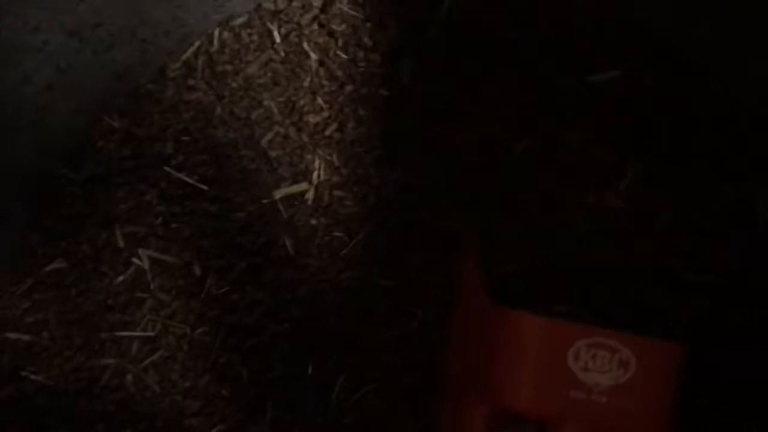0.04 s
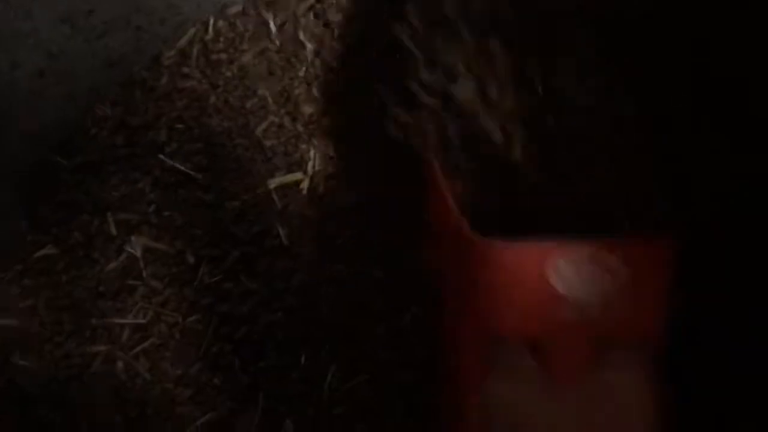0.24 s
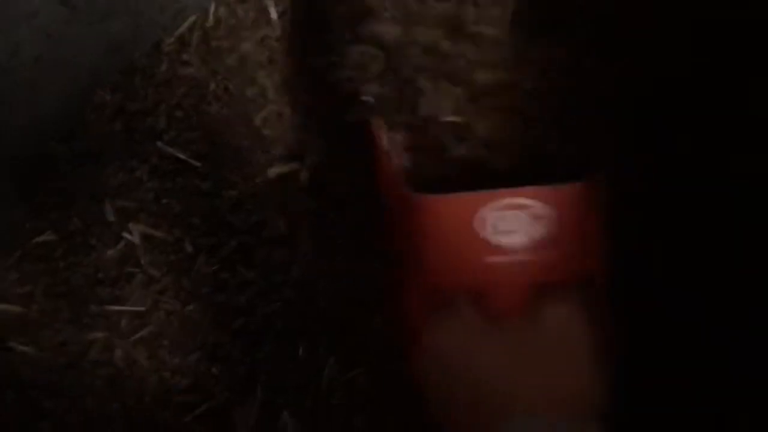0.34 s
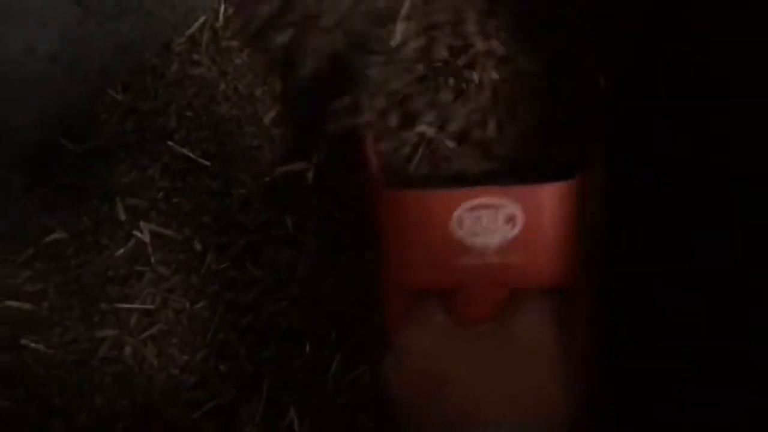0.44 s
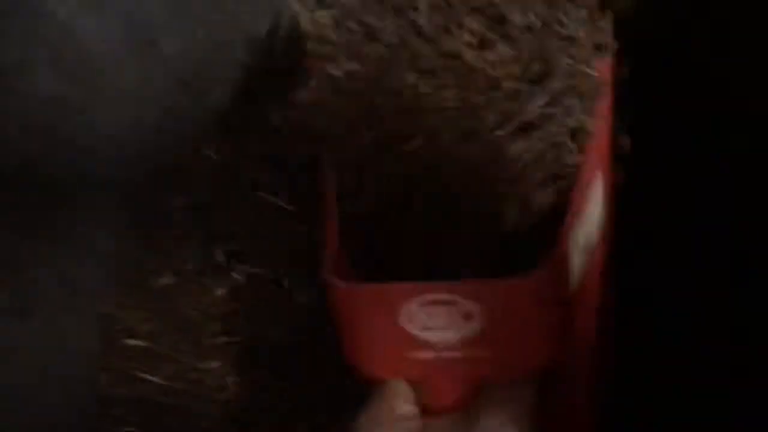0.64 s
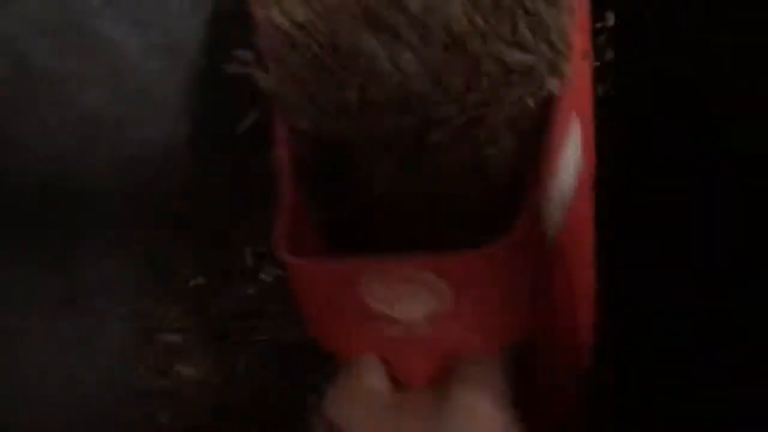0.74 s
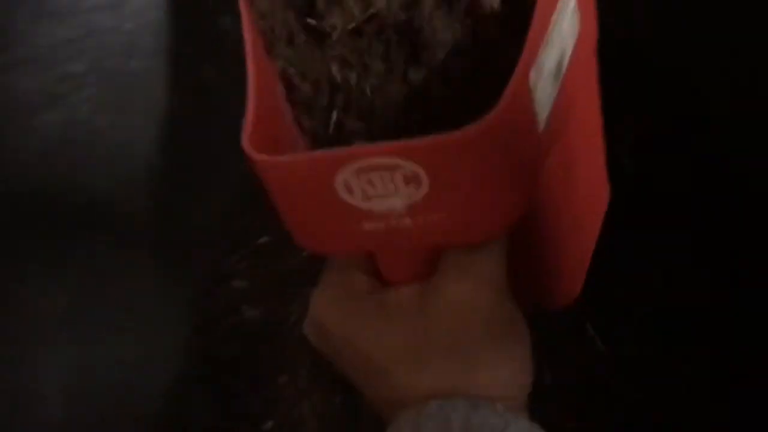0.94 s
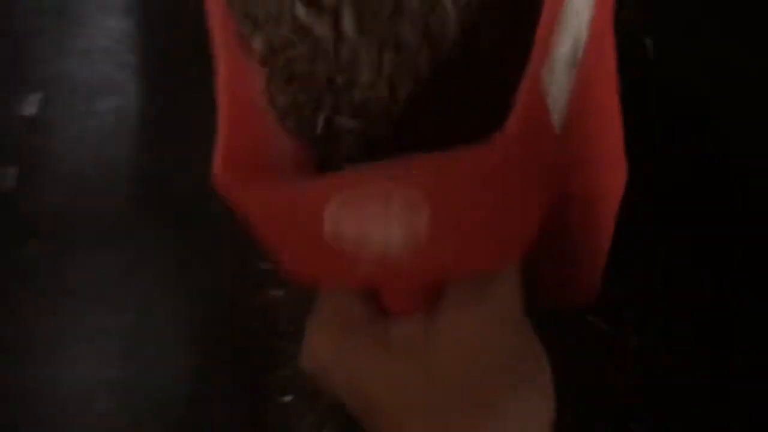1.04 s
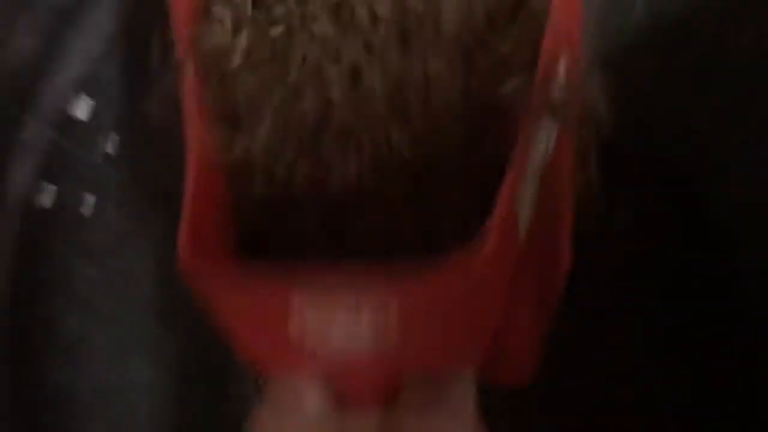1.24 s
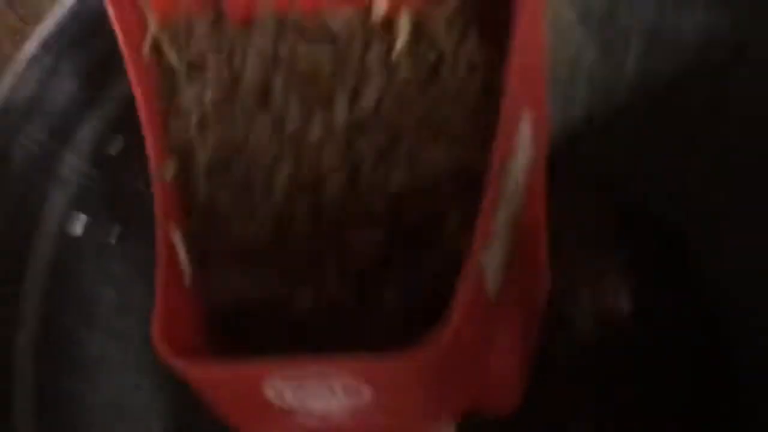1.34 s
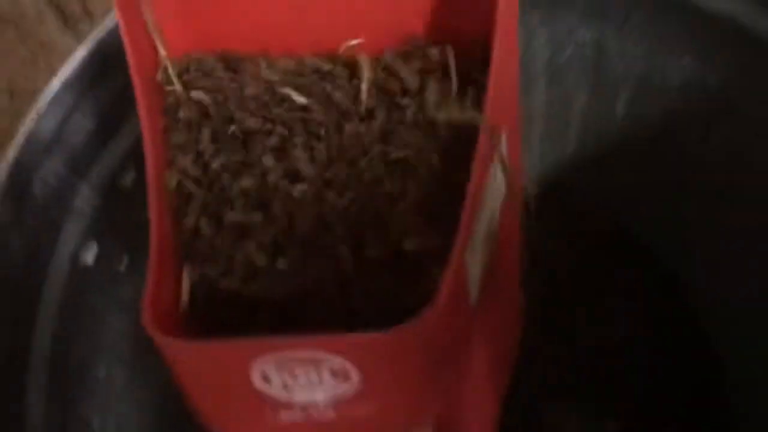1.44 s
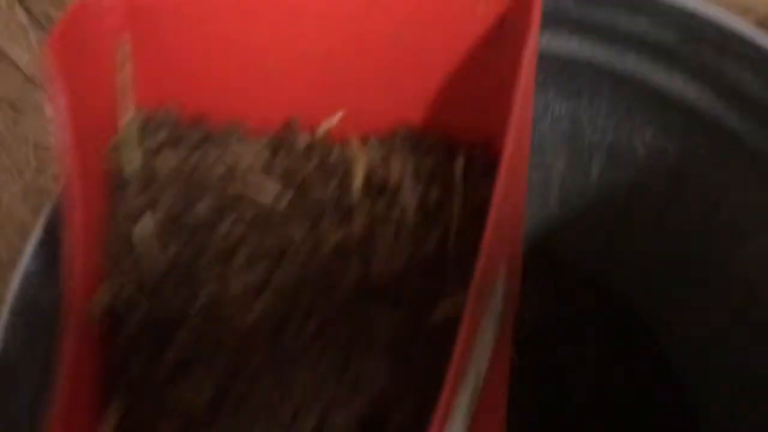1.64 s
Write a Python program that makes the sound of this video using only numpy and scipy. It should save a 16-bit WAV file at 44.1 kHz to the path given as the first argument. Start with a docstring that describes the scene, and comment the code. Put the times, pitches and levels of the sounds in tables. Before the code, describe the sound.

Close to the microphone, dry pellets rustle and crunch as a hollow plastic scoop digs in; a quieter lift follows, then a sharp rattling slide with knocks, a crisp shake and a few last strays, with short metal bin echo.

```python
"""Scoop in dry feed pellets

A plastic scoop is pushed through dry feed pellets in a thin metal bin, lifted and shaken, near a camera.
Crowds of noise puffs and tiny tones make the pellets rustle, and a moving resonance is the scoop's hollow.
Gritty noise puffs crunch, damped modes ring as pellets knock on the scoop, and both echo in the bin.
Brief low tones are the bin booming under the push, over a fading noise rumble and faint air."""
import sys
import numpy as np
from scipy import signal
from scipy.fft import rfft, irfft, next_fast_len
from scipy.io import wavfile

SR = 44100
rng = np.random.default_rng(int(sys.argv[2]) if len(sys.argv) > 2 else 0)


def transcribe(u):
    """Save the signal u as a 16-bit wav file named by the first command-line argument.

    u: samples, shape (n,) or (channels, n), limited to [-1, 1]; the rate is SR.
    q: integer samples, one column per channel.
    """
    v = np.clip(np.atleast_2d(u).T, -1, 1)
    q = np.round(v * 32767).astype(np.int16)
    wavfile.write(sys.argv[1], SR, q)


N = 74970  # length in samples


def amp(db):
    """Decibels to amplitude."""
    return 10 ** (np.asarray(db) / 20)


def unit(x):
    """x scaled to rms 1."""
    return x / np.sqrt(np.mean(x ** 2) + 1e-20)


def filtered(x, response):
    """x with its spectrum multiplied by a response of frequency."""
    m = next_fast_len(len(x) + 8192)
    return irfft(rfft(x, m) * response(np.fft.rfftfreq(m, 1 / SR)), m)[:len(x)]


def coloured(x, points):
    """x shaped by (Hz, dB) points joined on a log frequency axis, rms 1."""
    f, db = np.transpose(points)
    return unit(filtered(x, lambda hz: amp(np.interp(np.log(hz + 1), np.log(f + 1), db))))


# Movements: trickle, push, its last shove, lift, slide, shake, the shake's onset, settle, last strays.
# Columns: full_from_s, hold_s, rise_db_per_s, fall_db_per_s,
#          rustle_db, hollow_rattle_db, heap_thud_db, chaff_fizz_db
MOVEMENTS = [(.0, 0.89, 101, 20.5, -49, -63.5, -50, -63),
             (0.2957, 0.073, 167, 306, -23.5, -20.5, -27.5, -34),
             (0.4006, 0.028, 294, 217, -31, -29, -31, -42), (0.48, 0.31, 97, 58, -40.5, -40.5, -47, -49),
             (0.775, 0.12, 167, 71.5, -31, -30.5, -50.5, -42.5),
             (1.2985, 0.038, 193, 208, -31, -39, -43, -38),
             (1.218, 0.186, 252, 500, -46.5, -44.5, -47.5, -62),
             (1.529, 0.011, 244, 309, -39, -41.5, -48.5, -47.5),
             (1.42, .3, 100, 50, -57.5, -61.5, -58.5, -55.5)]
# Colour of pellets rubbing together. Columns: freq_hz, level_db (per Hz, relative)
RUSTLE_COLOUR = [(760, -14.5), (1300, -1.5), (1830, -1.5), (2600, -3), (3500, -1), (4580, -7.5),
                 (4950, -10.5), (6550, -3), (10500, -25.5), (13600, -26), (22000, -120)]
# Colour of the heap's dull thud. Columns: freq_hz, level_db (per Hz, relative)
HEAP_COLOUR = [(88, -3), (150, -8.5), (236, -7), (275, 0.5), (394, -1.5), (700, -7), (910, -23),
               (1540, -120)]
# Colour of the fine chaff. Columns: freq_hz, level_db (per Hz, relative)
CHAFF_COLOUR = [(5000, -30), (8500, -5.5), (10500, -12), (13200, -10.5), (16000, -19.5)]
TICK_DB = -11  # against the rustle


def pellets():
    """Each movement swells, holds and dies; four crowds of contacts follow it at their own levels."""
    t = np.arange(N) / SR
    power = np.zeros((4, N))
    for start, hold, rise, fall, *levels in MOVEMENTS:
        drop_db = rise * np.maximum(start - t, 0) + fall * np.maximum(t - start - hold, 0)
        power += amp(2 * (np.array(levels)[:, None] - drop_db))  # doubled dB: amplitude squared
    rustle = coloured(patter(570, 3.7, 0.0018, 0.093), RUSTLE_COLOUR) + amp(TICK_DB) * ticks()
    rattle = hollow(patter(200, 2.1, 0.0034, 0.17))
    thud = coloured(patter(87, 6.1, 0.0041, 0.86), HEAP_COLOUR)
    fizz = coloured(patter(250, 5.5, 0.00041, 0.5), CHAFF_COLOUR)
    return (np.sqrt(power) * [rustle, rattle, thud, fizz]).sum(axis=0)


def patter(per_s, scatter_db, life_s, hiss):
    """White contacts of uneven size, each a short puff of noise, over a share of steady hiss."""
    hits = rng.random(N) < per_s / SR
    sizes = hits * amp(scatter_db * np.minimum(rng.exponential(size=N), 3))
    t = np.arange(SR // 50) / SR
    puff_power = t / life_s * np.exp(-t / life_s)
    power = signal.fftconvolve(sizes ** 2, puff_power)[:N]
    hiss = np.clip(hiss, 0, 1)
    return np.sqrt(hiss + (1 - hiss) * np.abs(power) / power.mean()) * rng.standard_normal(N)


TICKS_PER_S, TICK_SCATTER_DB = 350, 2.5
TICK_HZ, TICK_SPREAD_OCT = 4016, 0.532
TICK_CYCLES = 3.4  # cycles to die to 1/e


def ticks():
    """Single pellets knocking together: tiny damped tones at random times, pitches and sizes, rms 1."""
    at, size = rng.random((2, 1500))
    on = np.arange(len(at)) < TICKS_PER_S * N / SR
    hz = np.clip(TICK_HZ * 2 ** (TICK_SPREAD_OCT * rng.standard_normal(len(at))), 600, 14000)
    strength = on * amp(-TICK_SCATTER_DB * np.log(size + 0.024))
    k = np.arange(256)
    turns = hz[:, None] * k / SR
    tones = np.sin(2 * np.pi * turns) * np.exp(-turns / TICK_CYCLES) * strength[:, None]
    places = (at * N).astype(int)[:, None] + k
    return unit(np.bincount(places.ravel(), tones.ravel())[:N])


# Pitch of the scoop's cavity as it tilts and fills. Columns: time_s, pitch_hz
HOLLOW_PITCH = [(.1, 842), (.33, 870), (.6, 910), (.77, 1060), (.87, 884), (1.05, 958), (1.7, 1070)]
HOLLOW_WIDTH_HZ = 508  # of one pass; the sound passes twice


def hollow(x):
    """The scoop's cavity: one resonance whose pitch moves with tilt and filling, rms 1."""
    s, hz = np.transpose(HOLLOW_PITCH)
    pitch = np.interp(np.arange(N) / SR, s, hz)
    step = 100.
    out = np.zeros(N)
    for centre in np.arange(7, 14) * step:  # crossfade between fixed resonances

        def ring(f):
            loss = 1j * f * HOLLOW_WIDTH_HZ
            return loss / (centre * centre - f * f + loss)

        share = np.clip(1 - abs(pitch - centre) / step, 0, 1)
        out += share * filtered(filtered(x, ring), ring)
    return unit(out)


# Single crunches. Columns: start_s, level_db, centre_hz, spread_octaves, length_ms
CRUNCH_HITS = [(0.016, -24, 4500, 0.27, 1.86), (0.046, -35, 4340, 0.54, 5.2),
               (0.1522, -30, 2280, 0.23, 4.7), (0.1828, -26, 2280, 0.26, 5),
               (0.2519, -19.5, 4100, 0.52, 11), (0.3017, -11, 3200, 0.88, 6.5),
               (0.599, -27.5, 7450.0, 1.3, 3.9), (0.6684, -22.5, 2660, 0.34, 1.6),
               (0.6872, -17.5, 2470, 0.77, 3.1), (0.7317, -22, 5690.0, 1.1, 4.2),
               (0.746, -14, 2830, 0.5, 3.5), (0.762, -16, 6130, 0.2, 8.1), (0.7742, -10, 3530, 0.2, 1.66),
               (0.78, -24, 4500, 0.88, 4.4), (0.8135, -12.5, 3200, 0.65, 3.7),
               (0.82, -19.5, 3590, 0.65, 6.6), (0.841, -20.5, 6600, 1.2, 7.9),
               (0.9413, -23.5, 4800, 0.5, 6.8), (1.2264, -25.5, 5350, 1.1, 4),
               (1.2785, -19, 6150, 0.72, 2.7), (1.2967, -20, 3860, 0.37, 2.9),
               (1.3229, -6.5, 6800, 0.18, 0.98), (1.3309, -9, 6200, 0.53, 1.1),
               (1.334, -9.5, 4630, 0.5, 1.4), (1.361, -13.5, 5670, 0.49, 0.74),
               (1.3824, -26.5, 5600, 0.49, 2.2), (1.528, -22.5, 4400, 0.78, 3.6),
               (1.5586, -20, 4100, 0.58, 2.3), (1.6516, -29.5, 8040, 0.91, 1.8),
               (1.662, -33, 10000, 0.37, 1.7)]
CRUNCH_RISE, CRUNCH_FALL_DB = 0.29, 12.5  # rise as a share of the length, fall over one length
CRUNCH_GRIT = 0.94  # 0 is a smooth puff, higher a cluster of spikes


def crunches():
    """Each crunch is a short gritty puff of noise around its own centre."""
    out, t = np.zeros(N + SR), np.arange(1024) / SR
    noises = rng.standard_normal((len(CRUNCH_HITS), len(t)))
    for (s, db, hz, spread, ms), noise in zip(CRUNCH_HITS, noises):

        def band(f):
            bell = np.exp(-(np.log2((f + 1) / hz) / (2 * spread)) ** 2)
            return bell * np.sqrt(hz / (f + hz))  # tilted towards the lows

        grit = filtered(noise * abs(noise) ** CRUNCH_GRIT, band)
        u = 1000 * t / ms
        shape = (1 - np.exp(-u / CRUNCH_RISE)) * amp(-CRUNCH_FALL_DB * u ** 2)
        puff = unit(grit * shape) * np.sqrt(np.mean(shape ** 2))
        out[round(s * SR):][:len(t)] += amp(db) * puff
    return out[:N]


# Modes of the scoop's wall. Columns: freq_hz, t60_s
SCOOP_MODES = [(340, 0.042), (880, 0.026), (1010, .035), (1120, 0.02), (1300, 0.012), (1720, 0.017),
               (2050, 0.011), (2500, 0.019), (2950, 0.0067), (3640, 0.018)]
# Pellets knocking on the scoop. Columns: start_s, level_db, centre_hz
KNOCK_HITS = [(.0175, -25, 2210), (.048, -27.5, 1390), (.0485, -21.5, 2500), (.325, -12.5, 1020),
              (.364, -19.5, 830), (0.564, -25.5, 1630), (0.7756, -7, 1480), (.781, -11, 1550),
              (.794, -19, 1520), (.823, -15.5, 1570), (.836, -18.5, 1030), (.855, -28, 900),
              (.972, -24.5, 1280), (1.023, -24.5, 2080), (1.0455, -32, 950), (1.055, -33, 980),
              (1.138, -47, 2910), (1.1765, -30.5, 1220), (1.226, -33, 350), (1.233, -22, 1320),
              (1.278, -32, 357), (1.382, -31.5, 1020), (1.394, -28, 1010), (1.559, -35, 1790)]
KNOCK_SPREAD_OCT, KNOCK_RISE_S = 0.19, 0.00049  # reach around the centre; onset time constant


def knocks():
    """Each knock rings the modes of the scoop that lie near its centre."""
    out, t = np.zeros(N + SR), np.arange(SR // 20) / SR
    hz, t60 = np.transpose(SCOOP_MODES)[:, :, None]
    phases = rng.random((len(KNOCK_HITS), len(SCOOP_MODES), 1))  # in turns
    for (s, db, centre), phase in zip(KNOCK_HITS, phases):
        share = np.exp(-(np.log2(hz / centre) / (2 * KNOCK_SPREAD_OCT)) ** 2)
        modes = share * amp(-60 * t / t60) * np.sin(2 * np.pi * (hz * t + phase))
        ring = modes.sum(axis=0) * (1 - np.exp(-t / KNOCK_RISE_S))
        out[round(s * SR):][:len(t)] += amp(db) * ring
    return out[:N]


BIN_T60_S, BIN_DB = 0.078, -10


def bin_echo(x):
    """A short dense echo off the metal walls: x convolved with decaying noise."""
    t = np.arange(SR // 5) / SR
    tail = rng.standard_normal(len(t)) * amp(-60 * t / BIN_T60_S) * (t > .002)
    return signal.fftconvolve(x, tail / np.linalg.norm(tail))[:N]


# Low shudders of the bin. Columns: centre_s, level_db, pitch_hz, length_s (centre to 1/e)
BIN_SHUDDERS = [(0.023, -36.5, 50, 0.0078), (0.096, -46, 90, 0.024), (0.178, -40.5, 95, 0.022),
                (0.285, -34, 110, 0.03), (0.348, -12.5, 119, 0.017), (0.365, -41, 45, 0.034),
                (0.414, -25, 119, 0.06), (0.639, -33, 85, 0.01), (0.698, -35, 85, 0.018),
                (0.769, -41, 60, 0.022), (0.906, -42.5, 62, 0.02), (1.04, -48, 55, 0.047)]
SHUDDER_ROUGH = 0.28  # depth of the random wavering


def shudders():
    """The bin's floor and walls sing low notes of wavering strength for a moment when pushed."""
    t = np.arange(N) / SR
    waver = 1 + SHUDDER_ROUGH * coloured(rng.standard_normal(N), [(0, -18), (40, 13), (120, -34)])
    notes = np.zeros(N)
    for s, db, hz, length in BIN_SHUDDERS:
        swell = np.exp(-((t - s) / length) ** 2)
        notes += np.sqrt(2) * amp(db) * swell * np.sin(2 * np.pi * hz * t)
    return waver * notes


# Colour of the rumble from bin and hand. Columns: freq_hz, level_db (per Hz, relative)
GRIP_COLOUR = [(30, -32), (48, -1.5), (90, -1), (140, -7.5), (300, -70)]
RUMBLE_DB, RUMBLE_FADE_DB_PER_S = -47.5, 5.5  # level at the start, steady fade


def handling():
    """Low noise rumble from bin and hand, fading as the scoop comes to rest."""
    fade = amp(RUMBLE_DB - RUMBLE_FADE_DB_PER_S * np.arange(N) / SR)
    return fade * coloured(rng.standard_normal(N), GRIP_COLOUR)


# Colour of the air: barn and camera. Columns: freq_hz, level_db (per Hz, relative)
AIR_COLOUR = [(60, -6), (400, -21), (1000, -37), (16000, -18)]
AIR_DB = -61.5


def air():
    """Steady background noise of barn and camera."""
    return amp(AIR_DB) * coloured(rng.standard_normal(N), AIR_COLOUR)


def scene():
    """Pellets, crunches and knocks with the bin's echo, shudders, rumble and air."""
    snaps = crunches() + knocks()
    echo = amp(BIN_DB) * bin_echo(snaps)
    return (pellets() + snaps + echo + shudders() + handling() + air())[None]


LOW_CUT_HZ, TOP_HZ = 34, 15800


def record(dry):
    """The camera thins the deep bass and keeps nothing above its band limit."""

    def response(hz):
        low_cut = (1j * hz / (LOW_CUT_HZ + 1j * hz)) ** 2
        return (hz < TOP_HZ) * low_cut

    return filtered(dry[0], response)[None]


dry = scene()
out = record(dry)
transcribe(out)
```